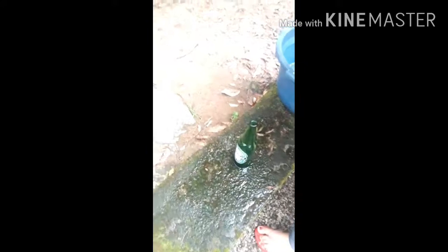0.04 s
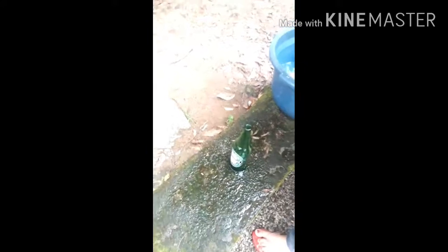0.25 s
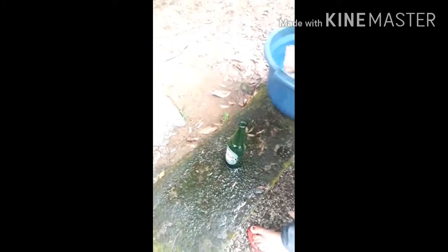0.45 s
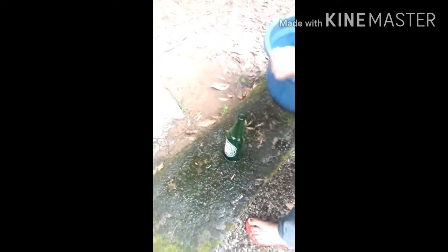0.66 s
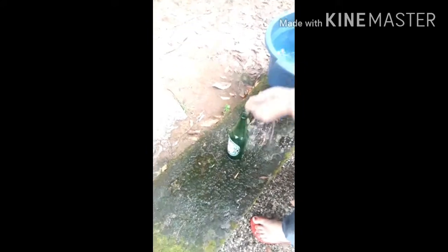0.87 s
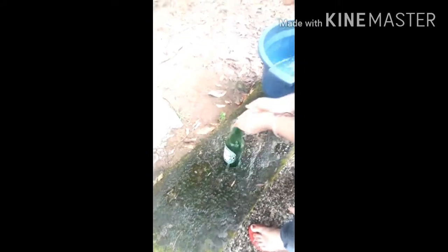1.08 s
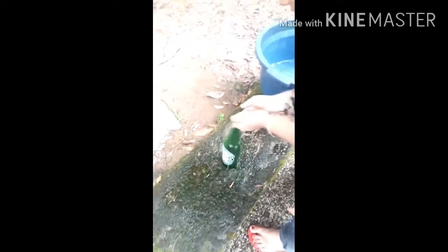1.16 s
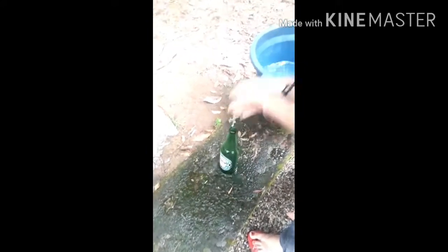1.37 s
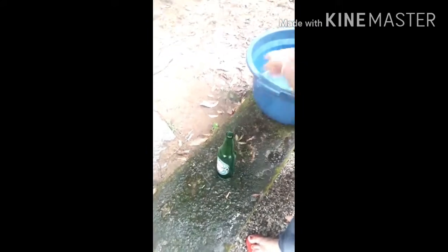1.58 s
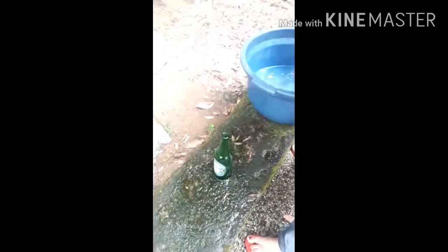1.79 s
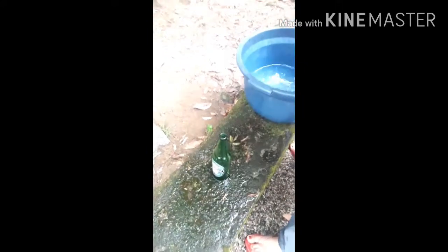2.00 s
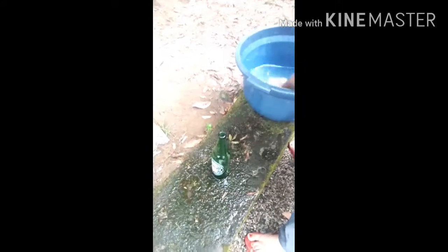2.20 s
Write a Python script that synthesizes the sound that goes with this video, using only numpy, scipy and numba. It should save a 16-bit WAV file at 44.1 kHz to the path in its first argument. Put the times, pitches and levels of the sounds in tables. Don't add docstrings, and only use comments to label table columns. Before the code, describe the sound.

Water splashing close up: soft bubbly stirring in a plastic bucket, then a crisp burst of drops slapping wet concrete around a glass bottle, thinning to drips before another small scoop; quiet outdoor yard, phone microphone.

```python
import sys
import numpy as np
from scipy import signal
from scipy.fft import rfft, irfft
from scipy.io import wavfile
from scipy.ndimage import uniform_filter1d
from numba import njit

SR = 44100
rng = np.random.default_rng(int(sys.argv[2]) if len(sys.argv) > 2 else 0)


def linear_from_db(decibels):
    return 10 ** (np.asarray(decibels, float) / 20)


def transcribe(u):
    v = np.clip(np.atleast_2d(u).T, -1, 1)
    q = np.round(v * 32767).astype(np.int16)
    wavfile.write(sys.argv[1], SR, q)


N = 99225

# (time [s], level [dB])
STIR_LEVEL = [(0, -52.5), (.09, -69), (.16, -60), (.3, -54), (.41, -52), (.432, -62.5), (.46, -47.5),
              (.62, -54), (.76, -69.5), (1.86, -79.5), (1.88, -76), (1.98, -54.5), (2.07, -69.5),
              (2.21, -69.5), (2.235, -51.5)]
# (frequency [Hz], level [dB])
STIR_TONE = [(200, -8.5), (310, -15.5), (480, -18.5), (850, -4.5), (1500, -7), (1950, -7), (3200, -4),
             (5500, -24)]
# (time [s], peak level [dB], pitch [Hz])
GULPS = [(0.019, -78, 990), (0.185, -41.5, 870), (0.23, -36, 1484), (0.235, -36.5, 873), (0.266, -42, 825),
         (0.304, -45.5, 960), (0.319, -38.5, 1376), (0.361, -43.5, 1460), (0.462, -44, 840),
         (0.482, -41, 1520), (0.52, -43.5, 890), (0.55, -40.5, 874), (0.196, -64, 907), (1.91, -50.5, 977),
         (1.932, -39, 994), (1.977, -40.5, 615), (2.044, -52.5, 801)]
# (time [s], peak level [dB], pitch [Hz])
BUBBLES = [(0.1276, -40.5, 2540), (0.18, -44, 2320), (0.2617, -24, 3170), (0.2753, -53, 2930),
           (0.308, -44, 3320), (0.3214, -37.5, 3300), (0.3471, -36, 2340), (0.4434, -53, 2920),
           (0.46, -32, 3070), (0.4735, -33.5, 2530), (0.516, -40, 3410), (0.528, -40, 2900),
           (0.577, -36.5, 2790), (0.5813, -31.5, 3020), (0.6061, -39.5, 3230), (0.6229, -29, 2350),
           (0.6275, -29, 2760), (0.681, -39.5, 3750), (0.382, -47, 2400), (0.255, -43, 3000),
           (1.039, -45, 2580), (1.3039, -33, 2660), (1.8738, -47.5, 3180), (1.966, -45, 3600),
           (1.9794, -32, 3036), (2.0309, -38.5, 3170), (2.0448, -36.5, 3850), (2.0544, -35, 3680),
           (2.177, -54.5, 1930)]
# (time [s], peak level [dB],
# pitch [Hz])
GROUND_DROPS = [(0.1876, -35, 6300), (0.3217, -24, 7960), (0.3446, -30, 8940), (0.518, -31, 8250),
                (0.6273, -30.5, 6330), (0.8, -38.5, 5330), (0.831, -23, 7540), (0.8395, -21.5, 9050),
                (0.8539, -28, 7100), (0.8683, -21, 13700), (0.8699, -23, 6530), (0.8883, -20.5, 8200),
                (0.8868, -26, 6600), (0.9069, -22.5, 9600), (0.923, -42, 5150), (0.929, -25, 4500),
                (0.9624, -17.5, 6630), (0.9707, -31, 8000), (0.981, -32, 12900), (0.9913, -28, 7660),
                (0.9997, -26, 11500), (1.0176, -25, 12600), (1.0845, -28.5, 11500), (1.0952, -39, 6700),
                (1.1296, -38, 6100),
                (1.1635, -34.5, 8440), (1.1765, -30.5, 8900), (1.1924, -65, 6070), (1.2045, -27, 11700),
              (1.205, -33, 6360), (1.2139, -23, 5650), (1.2485, -21, 6460), (1.2585, -38, 4800),
              (1.2679, -28, 12600), (1.272, -35, 8910), (1.3032, -29, 8300), (1.3178, -35.5, 6360),
              (1.3247, -38, 8500), (1.4087, -32.5, 9140), (1.4244, -39, 9150), (1.4377, -33.5, 8430),
                (1.6685, -31, 5830), (1.7285, -42, 8500), (1.7376, -47, 8750), (1.7452, -36.5, 10500),
                (1.755, -37, 9200), (1.7742, -43, 5800), (1.8251, -33, 7760), (1.8624, -36, 6240),
                (1.9016, -35.5, 8300), (1.919, -39, 7950), (1.9248, -30, 8070), (1.954, -35.5, 8700),
                (1.9792, -31.5, 8300), (1.984, -25.5, 8750), (1.9926, -22.5, 8700), (2.0521, -37.5, 4800),
                (2.1842, -43.5, 8500), (2.205, -49, 8550), (2.2323, -47, 5260), (2.2314, -31, 7930)]
# (time [s], peak level [dB], pitch [Hz])
SLAPS = [
    (.9523, -6, 5600),
    (.6245, -36, 2900),
    (1.2362, -15, 8000),
    (1.9778, -30, 2600),
]
# (time [s], level [dB])
MIST_LEVEL = [(0, -62), (.1, -71), (.25, -55.5), (.35, -54), (.55, -56.5), (.7, -59), (.8, -70.5),
              (.9, -54), (1.05, -71.5), (1.25, -54.5), (1.34, -56.5), (1.48, -77), (1.8, -86), (1.9, -63.5),
              (2.0, -56), (2.1, -72), (2.215, -101), (2.235, -54.5)]
# (frequency [Hz], level [dB])
MIST_TONE = [(880, -62), (1500, -11.5), (2140, -9.5), (3590, -0.5), (8920, -3), (14900, -15.5),
             (16000, -11)]
# (time [s], peak level [dB], pitch
# [Hz])
STRAY_DROPS = [(.2426, -40, 8700), (.3065, -46, 10100), (.4415, -35, 3930), (.444, -42, 10500),
               (.4956, -34.5, 8800), (.527, -42, 11900), (.5679, -48, 9400), (.5819, -31, 10100),
               (.629, -38, 12600), (.7076, -58, 8850), (.8735, -28, 4630), (.8885, -21, 12000),
               (.9278, -22, 13400), (.9285, -23, 8250), (.9455, -33, 7900), (.949, -51, 6850),
               (1.0005, -34.5, 5440), (1.1291, -37, 14100), (1.1495, -41, 12900), (1.2325, -22, 8640),
               (1.233, -22, 12900), (1.2505, -28, 10000), (1.343, -49, 12700), (1.5007, -52, 12000),
               (1.5137, -48, 12400), (1.5711, -44.5, 8400), (1.569, -58, 4070), (1.934, -55, 5600),
               (1.9925, -30, 4060), (2.094, -49.5, 8700)]
# (time [s], peak level [dB], pitch [Hz])
HOLLOW_PATS = [(.8722, -27.5, 3060), (.8882, -30.5, 3050), (.928, -34, 2840), (.9904, -41, 3300),
               (.983, -54, 2830), (1.1625, -54, 2900), (1.2146, -38, 2870), (1.264, -37, 2900),
               (1.6668, -46.5, 2800), (1.926, -39, 1164), (.4635, -31.5, 1235), (2.055, -45.5, 2150)]
# (time [s], peak level [dB], pitch [Hz])
TRICKLE = [(1.37, -60, 1650), (1.39, -64, 1730), (2.06, -55, 721), (2.07, -53, 2070), (2.09, -60, 597),
           (2.118, -59, 2020), (2.15, -63, 2080), (2.205, -60, 617), (2.238, -44, 3700), (.4, -44, 1720),
           (.37, -55, 524)]
# (time [s], peak level [dB], pitch [Hz])
PINGS = [(.453, -39.5, 8180), (.47, -39, 5540), (.519, -39, 7860), (.6135, -36, 13800), (.614, -38, 9340),
         (.629, -51, 6700), (.6815, -42, 5720), (.869, -36, 6530), (1.305, -38, 8740), (1.325, -45, 8800),
         (1.605, -59, 7300), (2.178, -54.5, 4230), (1.096, -44, 14600), (1.272, -39, 14600),
         (1.409, -39, 13900), (1.6676, -29, 7070), (1.8245, -37, 7230)]
# (time [s], peak level [dB], pitch [Hz])
KNOCKS = [
    (.35, -57.5, 296),
    (.455, -56.5, 305),
    (.51, -54.5, 317.5),
    (1.35, -54, 184.4),
    (1.41, -51, 180.2),
    (1.97, -60, 290),
]
# (frequency [Hz], level [dB])
YARD_TONE = [(55, -10.5), (134, -3), (260, -14.5), (560, -34.5), (3220, -55), (6380, -28), (9000, -31.5),
             (16000, -41.5)]


def unit(x):
    return x / np.sqrt(np.mean(x ** 2))


def level_curve(table):
    t, db = np.array(table, float).T
    return linear_from_db(np.interp(np.arange(N) / SR, t, db))


def tone_db(table, hz):
    f, db = np.array(table, float).T
    return np.interp(np.log(hz), np.log(f), db, left=-90)


@njit
def ring(rows, count):
    out = np.zeros(count)
    for s, size, hz, decay, rise, glide in rows:
        at = s * SR
        for i in range(max(int(at) + 1, 0), min(int(at + (7 * decay + rise) * SR), count)):
            u = (i - at) / SR
            turns = hz * (u + glide * u * u / (2 * decay) / (1 + u / (4 * decay)))
            swell = (1 - np.exp(-2 * u / rise)) ** 2
            out[i] += size * np.exp(-u / decay) * swell * np.sin(2 * np.pi * turns)
    return out


def grains(s, size, hz, decay, rise, glide):
    hz = np.clip(hz, 100, 16000)
    columns = np.broadcast_arrays(s, size, hz, np.maximum(decay, 3e-5), rise, glide)
    return ring(np.stack(columns, axis=-1).reshape(-1, 6), N)


def wander(rate):
    hold = int(SR / rate)
    levels = rng.standard_normal(N // 100 + 2)[:N // hold + 1]
    steps = np.repeat(levels, hold)
    smooth = uniform_filter1d(uniform_filter1d(steps, hold), hold)
    return unit(smooth[:N])


def noise(table, flicker_db, rate):
    f = np.maximum(np.arange(N // 2 + 1) * SR / N, 1)
    shape = linear_from_db(tone_db(table, f))
    out = 0
    for hz in 30 * 2 ** np.arange(0, 9.6, .5):
        bell = np.cos(np.pi * np.clip(np.log2(f / hz), -.5, .5))
        flicker = linear_from_db(flicker_db * wander(rate))
        out = out + flicker * irfft(rfft(rng.standard_normal(N)) * shape * bell, N)
    return unit(out)


def swarm(table, count, cycles, scatter_db, glide):
    low, high = np.log(table[0][0]), np.log(table[-1][0])
    when, pitch, luck, length = rng.random((count, 4)).T
    hz = np.exp(low + (high - low) * pitch)
    decay = cycles * (.5 + length) / hz
    size = linear_from_db(tone_db(table, hz) - scatter_db * np.log(1 - luck + 4e-3)) * hz
    return unit(grains(when * N / SR, size, hz, decay, decay / 4, glide))


def bubbles(table, cycles, rise, glide):
    s, db, hz = np.array(table, float).T
    decay = cycles / hz
    delay, detune = rng.standard_normal((len(s), 2)).T
    size = linear_from_db(db) * (1 + 2 * rise / decay)
    first = grains(s, size, hz, decay, rise, glide)
    twin_s = s + decay * (1 + 0.546 * abs(delay))
    twin = grains(twin_s, size * linear_from_db(-9), hz * (1 + 0.045 * detune), decay, rise, glide)
    return first + twin


def splats(table, spray_db=-9.5, tick_db=0, tick_cycles=1.6, count=24):
    s, db, hz = np.array(table, float).T[:, :, None]
    late = -np.log(1 - rng.random((len(s), count)))
    octaves = 0.55 * np.maximum(rng.standard_normal((len(s), count)) + 0.33, -.35)
    spray_hz = hz * 2 ** octaves
    tick = grains(s, linear_from_db(db + tick_db), hz, tick_cycles / hz, .2 / hz, 0.)
    tiny_ring = grains(s, linear_from_db(db + spray_db + 3.5), hz, 0.00075, 0.00055, 0.027)
    spray_size = linear_from_db(db + spray_db - 3.6 * late)
    spray = grains(s + .0024 * late, spray_size, spray_hz, 3.2 / spray_hz, .00005, 0.26)
    no_lows = signal.butter(7, 3080, "high", fs=SR, output="sos")
    return signal.sosfilt(no_lows, tick + tiny_ring + spray)


def stirred_water():
    swirl = swarm(STIR_TONE, count=5000, cycles=6.16, scatter_db=2.8, glide=0.083)
    wash = linear_from_db(-5.5) * noise(STIR_TONE, flicker_db=4.5, rate=40.39)
    surges = linear_from_db(-0.5 + 3.2 * wander(35.14))
    return (swirl + wash) * surges * level_curve(STIR_LEVEL)


def trapped_air():
    gulps = bubbles(GULPS, cycles=5.1, rise=.004, glide=0.0043)
    return gulps + bubbles(BUBBLES, cycles=4.5, rise=.0012, glide=0.042)


def fine_droplets():
    patter = swarm(MIST_TONE, count=9000, cycles=6, scatter_db=2.5, glide=0.053)
    return patter + linear_from_db(-1) * noise(MIST_TONE, flicker_db=1.3, rate=62.3)


def heavy_drops():
    slap = splats(SLAPS, spray_db=-20.5, tick_db=14, tick_cycles=.3)
    slap_ring = grains(SLAPS[0][0], linear_from_db(-18), 3150, 0.00043, 0.00032, 0.052)
    plop_size = linear_from_db(-19.5 - np.array([3, 16]))
    plop = grains(1.29, plop_size, 1857 * np.array([1, 1.3]), .0022, .0012, .27)
    return slap + slap_ring + plop


def wet_ground():
    mist = fine_droplets()
    heavy = heavy_drops()
    flurries = linear_from_db(2.6 * wander(130))
    drops = splats(GROUND_DROPS)
    return mist * flurries * level_curve(MIST_LEVEL) + heavy + drops


def stray_drops():
    return splats(STRAY_DROPS) + bubbles(HOLLOW_PATS, cycles=2.314, rise=0.00066, glide=0.017)


def trickle_and_pings():
    trickle = bubbles(TRICKLE, cycles=6.93, rise=0.0017, glide=0.028)
    return trickle + bubbles(PINGS, cycles=16, rise=0.00052, glide=0.0054)


def bucket_knocks():
    return bubbles(KNOCKS, cycles=7.1, rise=0.002, glide=0.015)


def echo(water):
    fade_s, dull_hz = 0.18, 3300
    u = np.arange(SR // 4) / SR
    tail = rng.standard_normal(len(u)) * np.exp(-np.log(1000) * u / fade_s) * (u > .002)
    tail = signal.sosfilt(signal.butter(1, dull_hz, fs=SR, output="sos"), tail)
    tail = tail / np.sqrt(np.sum(tail ** 2))
    return linear_from_db(-17.5) * signal.fftconvolve(water, tail)[:N]


def hum():
    t = np.arange(N) / SR
    level = linear_from_db(-66 - 7.7 * (t - 1.1) ** 2)
    return level * np.sin(2 * np.pi * 45 * t + 0.47 * wander(0.75)) * np.sqrt(2)


def insect():
    pitch_hz, width_hz, middle_s, span_s = 6330, 110, 1.585, .085
    t = np.arange(N) / SR
    band = signal.butter(1, [pitch_hz - width_hz, pitch_hz + width_hz], "band", fs=SR, output="sos")
    trill = unit(signal.sosfilt(band, rng.standard_normal(N)))
    return linear_from_db(-72) * trill * np.exp(-((t - middle_s) / span_s) ** 2)


def traffic():
    return linear_from_db(-62) * noise(YARD_TONE, flicker_db=2.2, rate=8.67)


def scene():
    water = stirred_water() + trapped_air() + wet_ground()
    water = water + stray_drops() + trickle_and_pings() + bucket_knocks()
    mono = water + echo(water) + hum() + insect() + traffic()
    side = linear_from_db(-24.5) * (0.37 * mono + 0.31 * np.gradient(mono)) * wander(180)
    return np.array([mono + side, mono - side])


def roll_off(x):
    return signal.sosfilt(signal.butter(12, 16600, fs=SR, output="sos"), x)


def record(dry):
    no_bass = signal.butter(6, 38, "high", fs=SR, output="sos")
    no_top = signal.ellip(8, .5, 45, 15600, fs=SR, output="sos")
    mix = signal.sosfilt(no_top, signal.sosfilt(no_bass, dry))
    return roll_off(mix)


dry = scene()
out = record(dry)
transcribe(out)
```